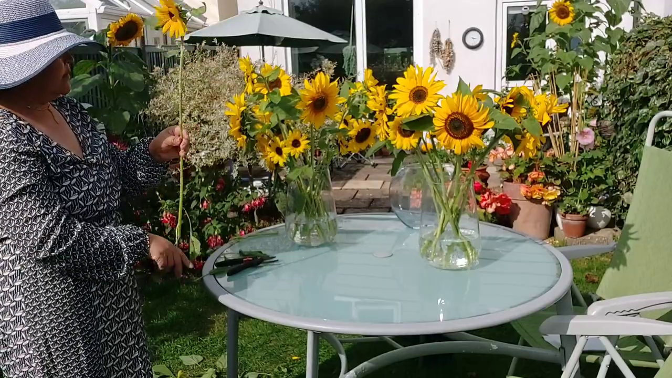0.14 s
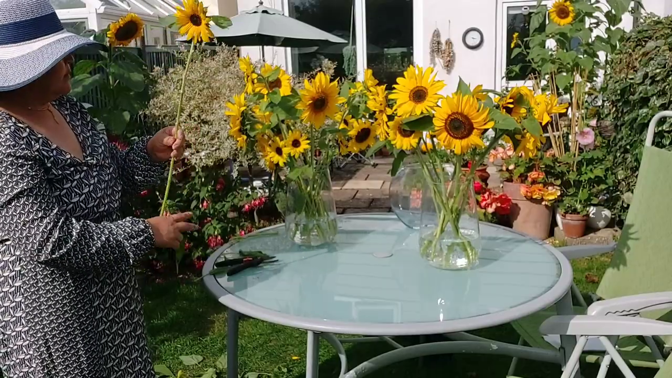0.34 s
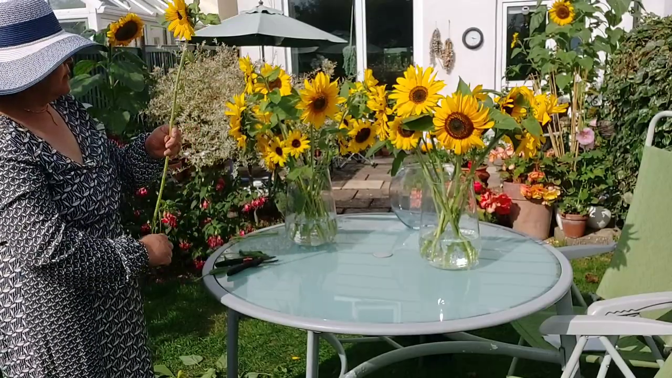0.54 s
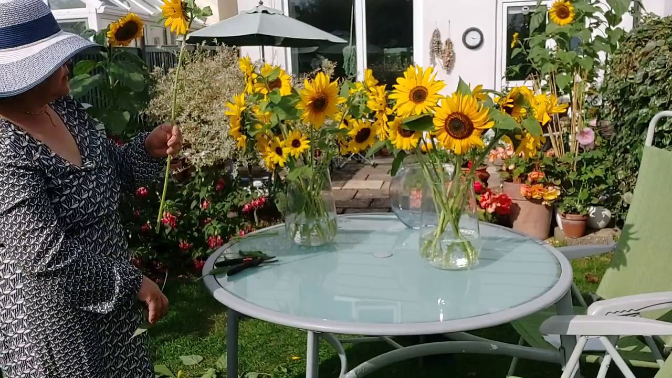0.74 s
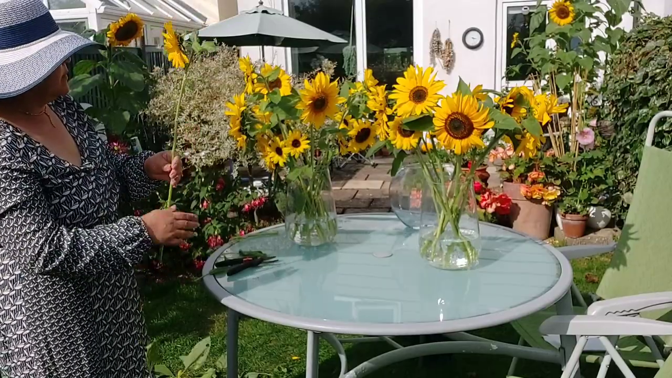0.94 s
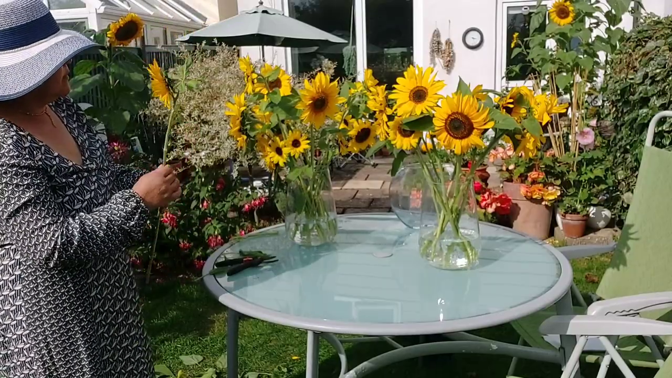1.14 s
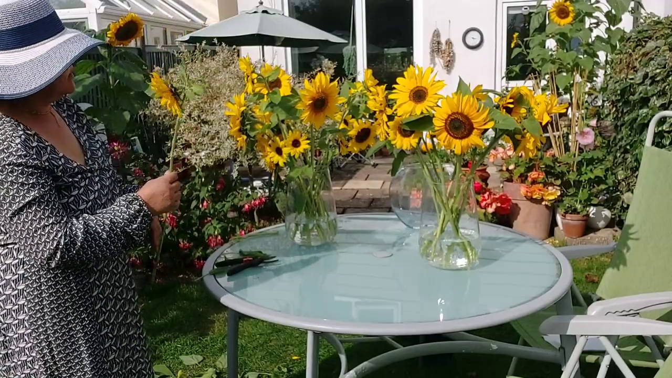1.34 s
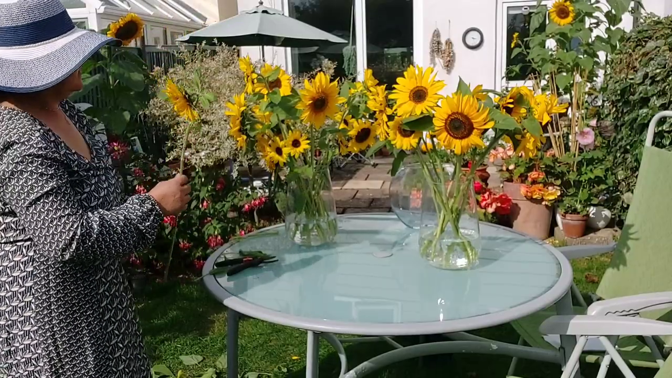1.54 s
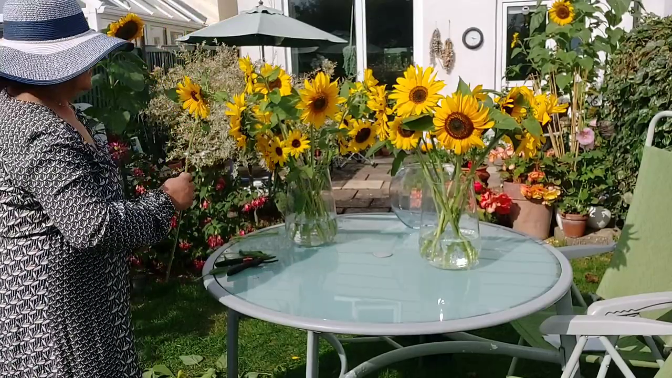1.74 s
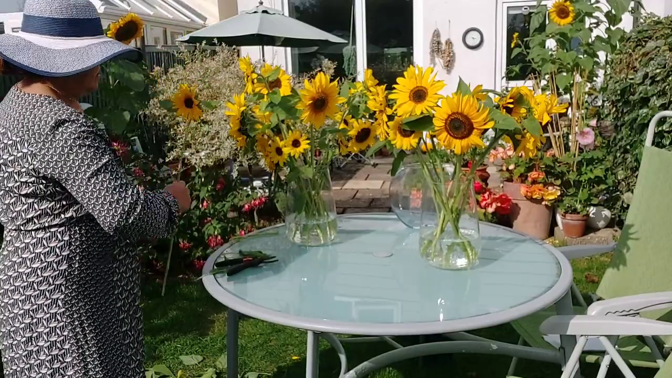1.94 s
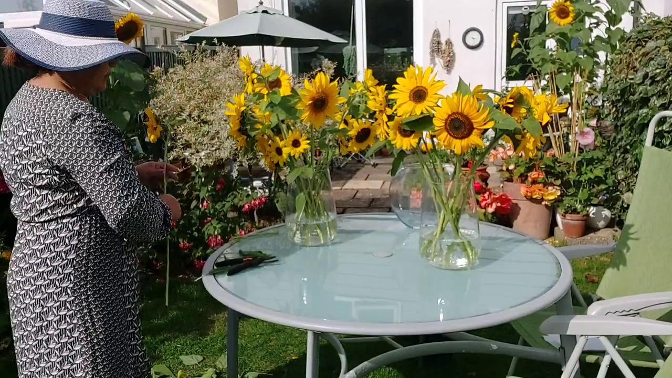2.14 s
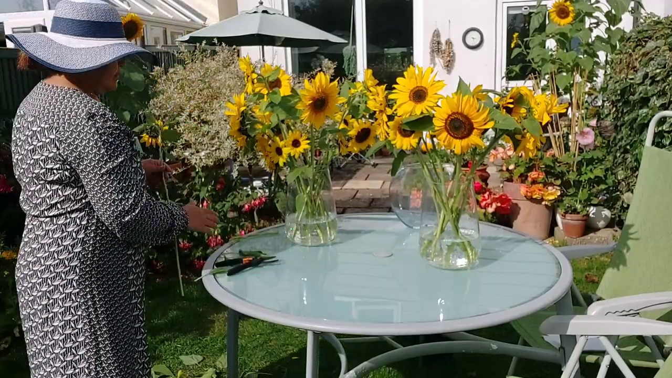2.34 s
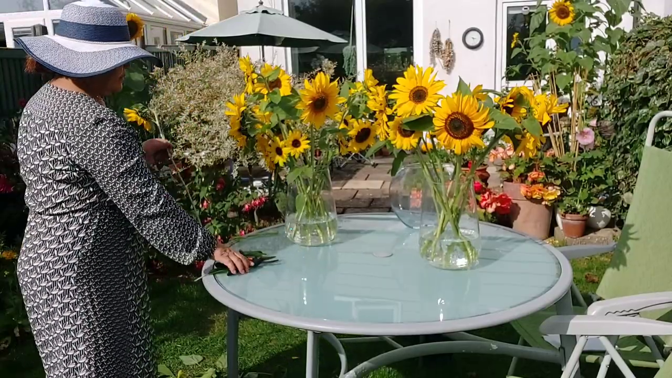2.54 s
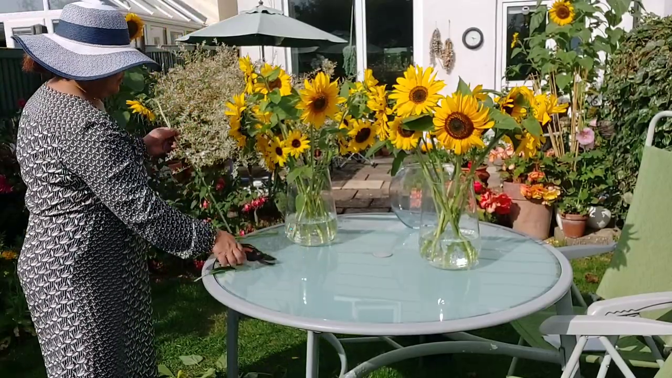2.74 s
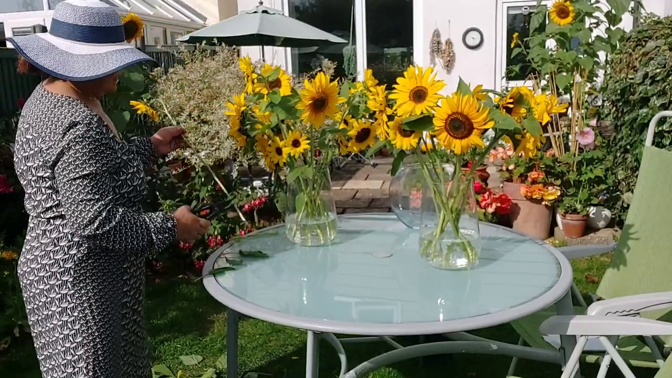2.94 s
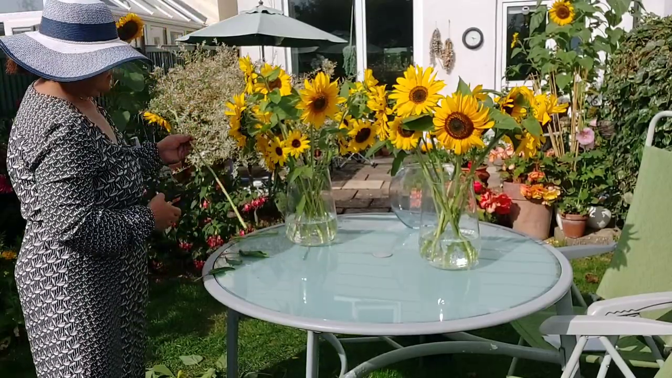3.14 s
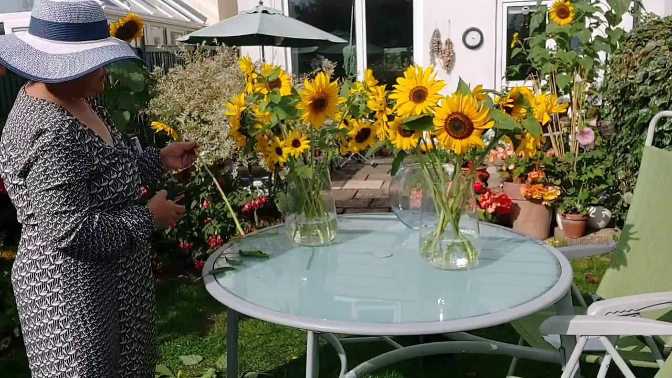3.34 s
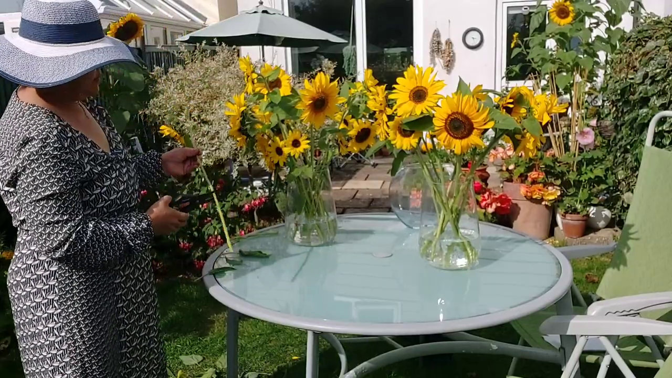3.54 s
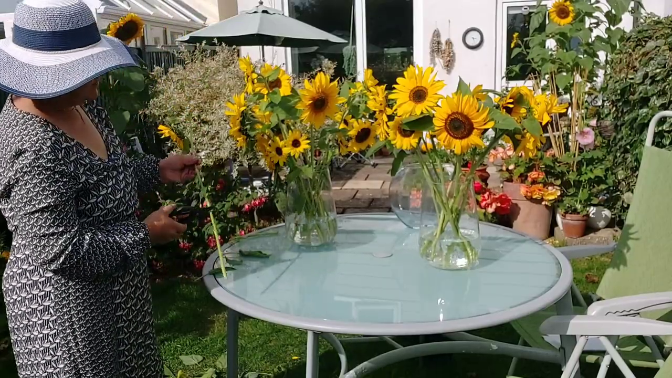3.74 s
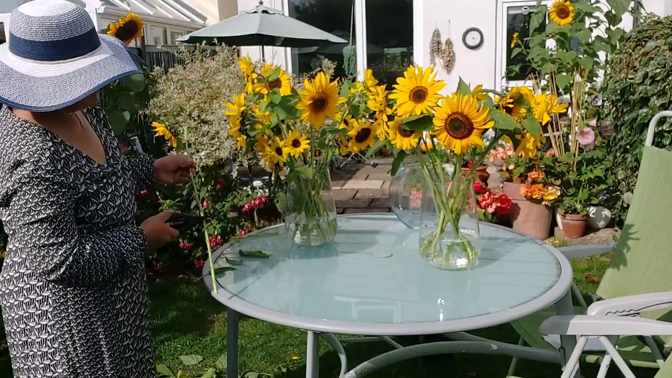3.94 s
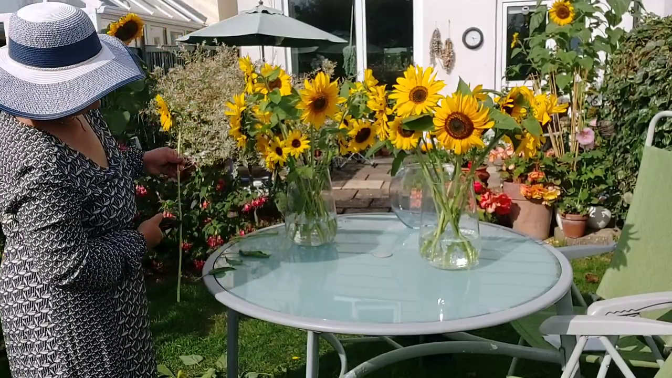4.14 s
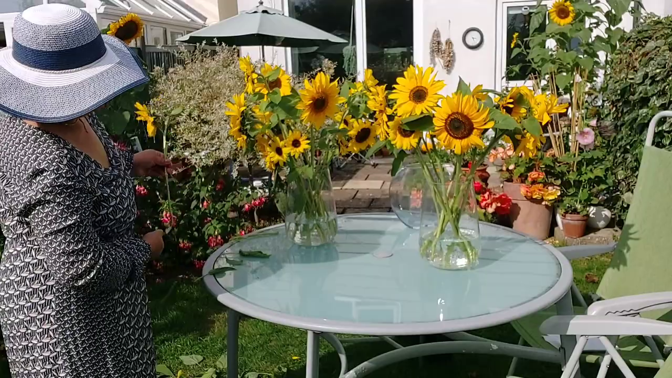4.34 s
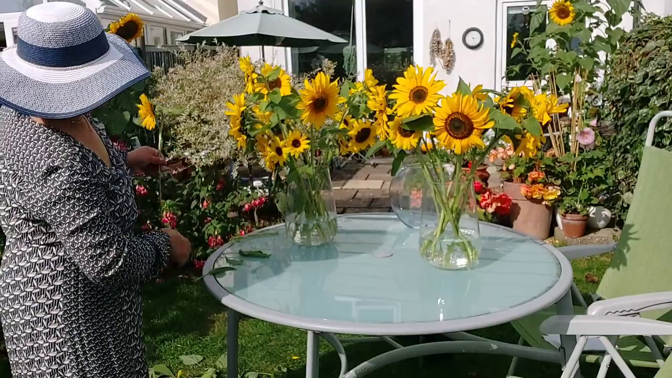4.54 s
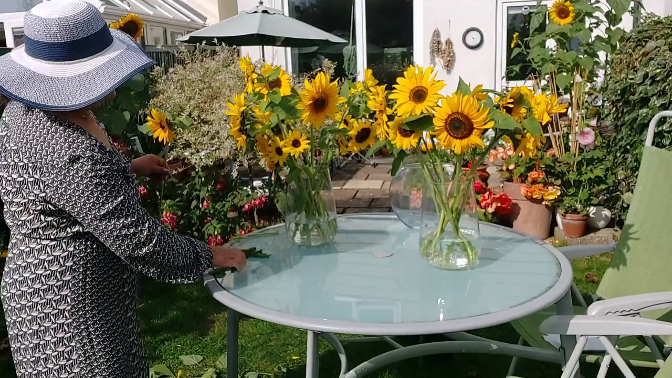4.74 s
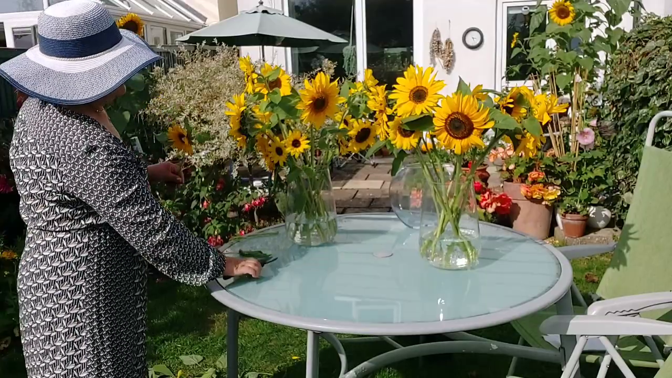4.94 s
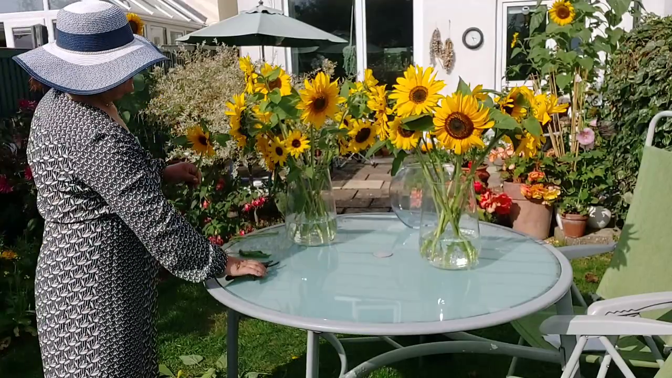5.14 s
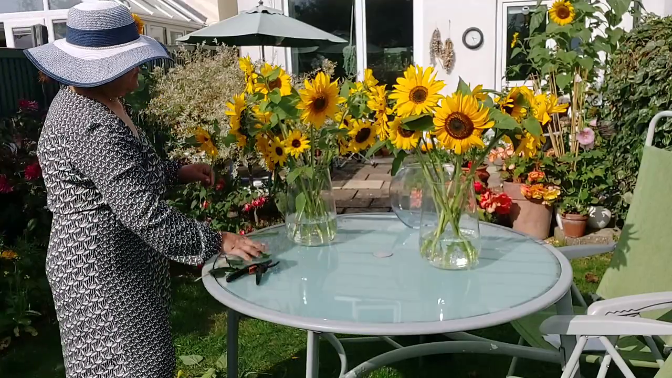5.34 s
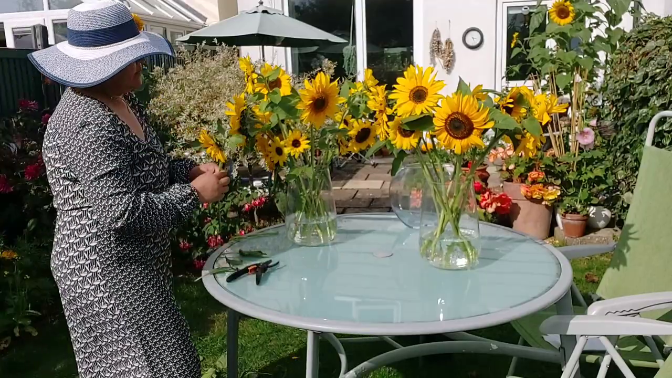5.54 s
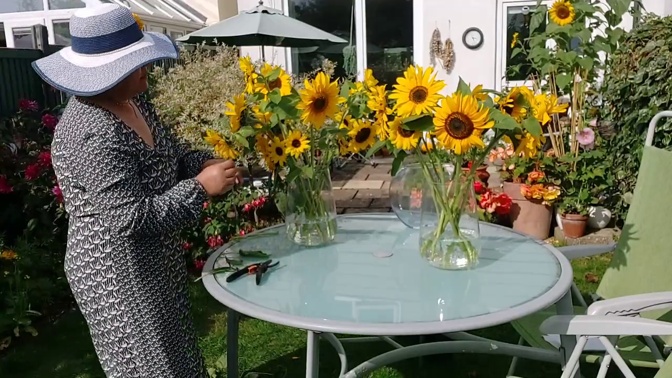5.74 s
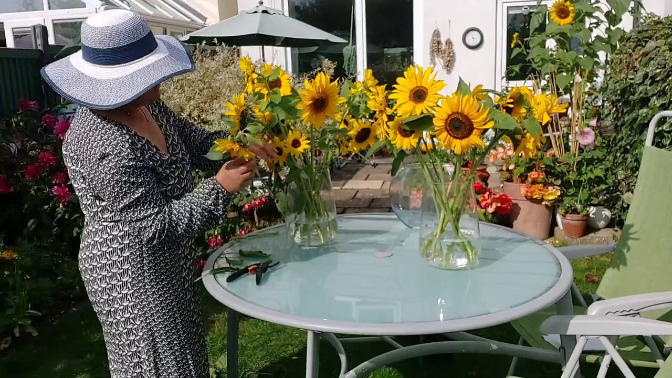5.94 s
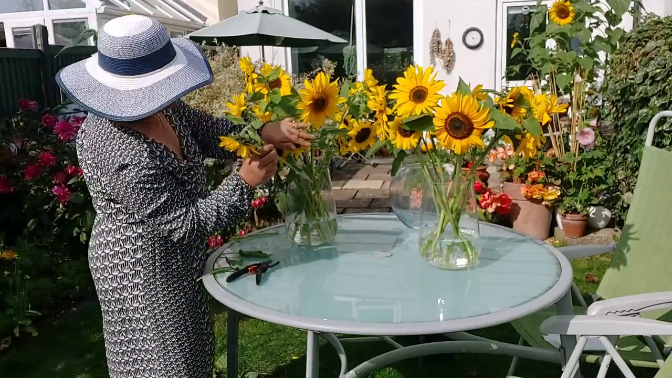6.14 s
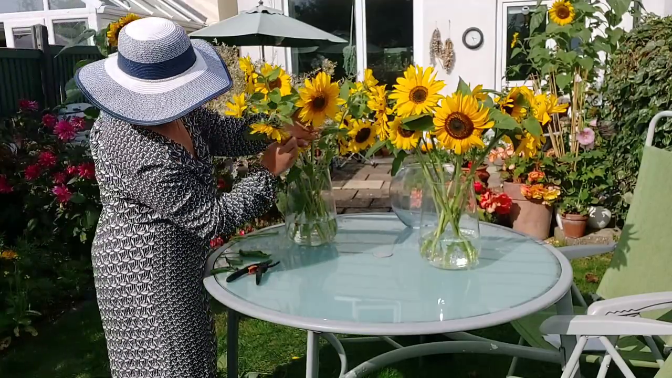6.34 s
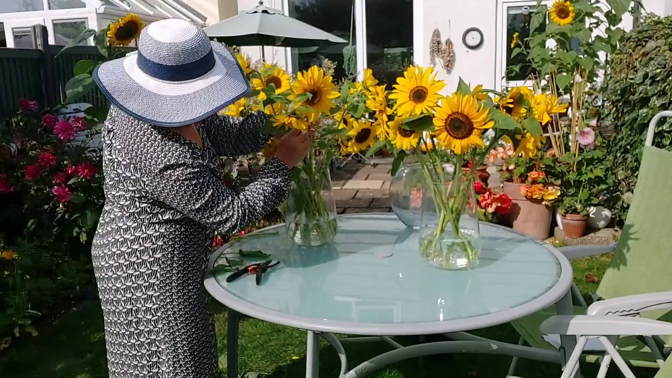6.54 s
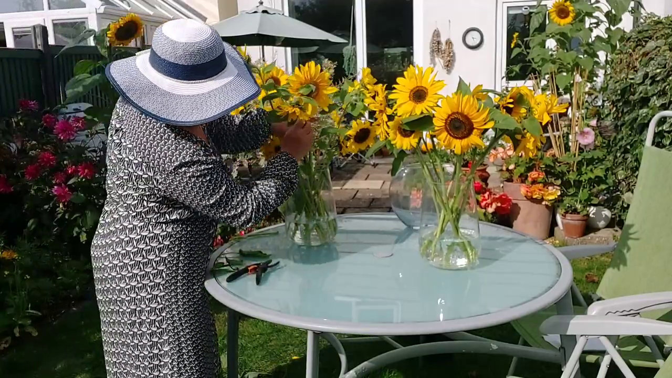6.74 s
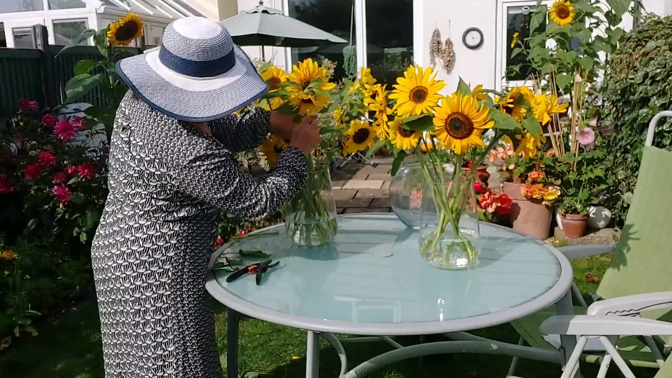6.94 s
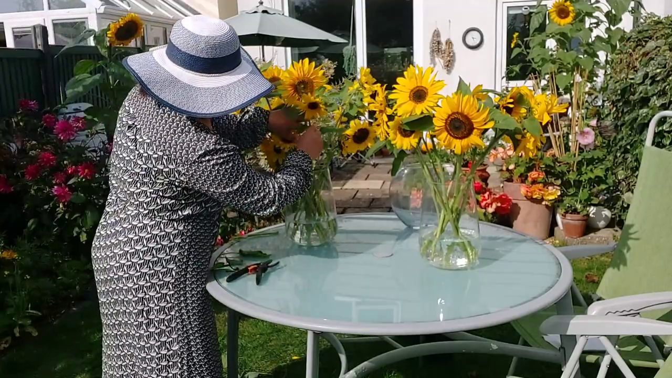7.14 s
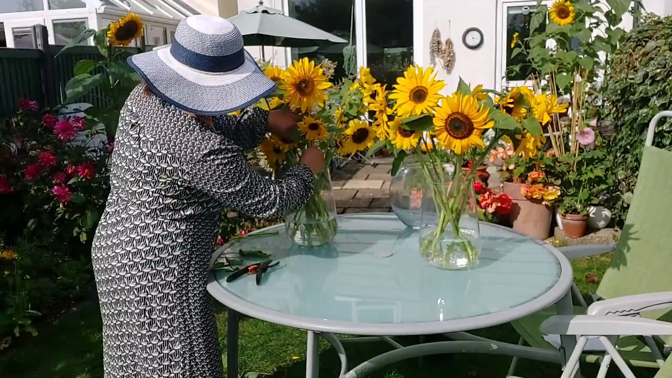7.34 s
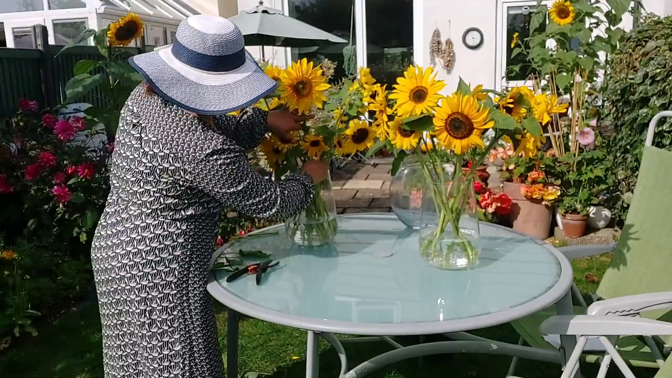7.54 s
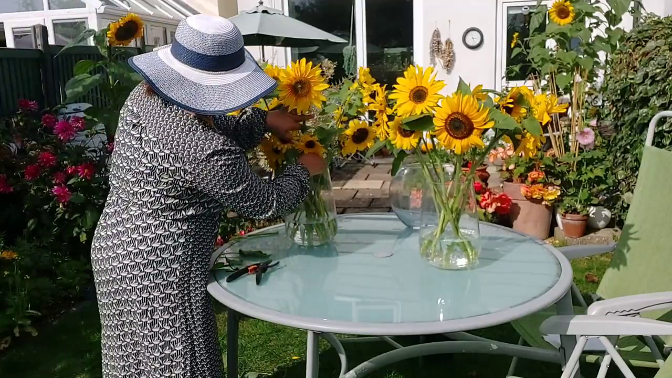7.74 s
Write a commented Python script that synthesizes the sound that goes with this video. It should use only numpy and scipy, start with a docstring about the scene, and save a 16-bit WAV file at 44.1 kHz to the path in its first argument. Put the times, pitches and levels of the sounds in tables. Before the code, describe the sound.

Outdoors, leaves and cloth rustle softly, metal shears are lifted, snip a stem once and knock down on glass over a low town hum.

```python
"""Flowers are trimmed at a glass table in a garden, heard in stereo from a few metres away.
Over the drone of a town, traffic fades and returns and an engine's low hum swells once: noise, slow tones.
Leaves and a dress rustle and tick from the start: crackles of tiny clicks under gain strokes.
Pruning shears clack as they are picked up, crunch through one thick stem and are laid back on the glass:
decaying modes and noise for each blow, coloured crackle for the tearing and the scrape on the glass."""
import sys
import numpy as np
from scipy import signal
from scipy.fft import rfft, irfft, next_fast_len
from scipy.io import wavfile
from scipy.ndimage import uniform_filter1d, map_coordinates

SR = 44100
rng = np.random.default_rng(int(sys.argv[2]) if len(sys.argv) > 2 else 0)


def int16_out(signal):
    """Quantize to a 16-bit WAV file."""
    q = np.round(np.clip(np.atleast_2d(signal).T, -1, 1) * 32767)
    wavfile.write(sys.argv[1], SR, q.astype(np.int16))


N = 342921
T = np.arange(N) / SR
RING = T[:SR // 2]  # time axis of one ringing sound, s


def undb(db):
    """Decibels to gain."""
    return 10 ** (np.asarray(db) / 20)


def unit(x):
    """Scale to rms 1."""
    return x / np.sqrt(np.mean(x ** 2))


def add(out, s, sound):
    """Mix a sound in at time s."""
    i = max(int(s * SR), 0)
    out[:, i:i + sound.shape[1]] += sound[:, :N - i]


def on_log(hz, points):
    """Read (f/Hz, value) points on a log-frequency axis."""
    f, value = np.transpose(points)
    return np.interp(np.log(hz + 1), np.log(f), value)


def bins(x):
    """Frequencies of a signal's spectrum."""
    return np.fft.rfftfreq(x.shape[-1], 1 / SR)


def colour(x, points):
    """Filter a signal through a (f/Hz, level/dB) curve, then set it to rms 1."""
    size = next_fast_len(x.shape[-1])
    gain = undb(on_log(np.fft.rfftfreq(size, 1 / SR), points))
    return unit(irfft(rfft(x, size) * gain, size)[..., :x.shape[-1]])


def spread(pair, reach=1):
    """Two unrelated signals become left and right: alike in the bass; a larger reach keeps them alike higher up."""
    # likeness of two microphones in diffuse sound: f/Hz, correlation
    likeness = [(40, 0.99), (130, 0.94), (300, 0.89), (1000, 0), (2000, 0), (4000, 0.011), (16000, 0)]
    alike = np.clip(on_log(bins(pair) / reach, likeness), -1, 1)
    mid, side = irfft(rfft(pair) * np.sqrt([1 + alike, 1 - alike]), pair.shape[1])
    return np.array([mid + side, mid - side]) / 2


def air(points, size=N, reach=1):
    """Stereo noise of a given colour."""
    noise = rng.standard_normal((2, next_fast_len(size)))
    return colour(spread(noise, reach), points)[:, :size]


def walk(rate):
    """Slow chance with a spread near 1: random values, rate per second, joined smoothly."""
    k = int(SR / rate)
    steps = np.repeat(rng.standard_normal(N // k + 1), k)
    return unit(uniform_filter1d(steps, k)[:N])


def fade(t60):
    """Free decay, 60 dB in t60 seconds."""
    return np.exp(-np.log(1000) * RING / t60)


def gesture(strokes):
    """Gain of strokes that each grow 20 dB over the rise time and sink 20 dB over the fall time; powers add."""
    flank_db = 20
    power = 0
    for s, db, rise, fall in strokes:
        below_peak = np.maximum((s - T) / rise, (T - s) / fall)
        power = power + undb(db - flank_db * np.minimum(below_peak, 10)) ** 2
    return np.sqrt(power)


def flutter(x, depth_db, rate, count=22):
    """Let each of a number of bands waver in level on its own, rate times a second."""
    hz, s, cells = signal.stft(x, SR, nperseg=512)
    band = np.interp(np.log1p(hz), np.log([400, 12000]), [0, count - 1])
    chance = rng.standard_normal((count, int(T[-1] * rate) + 3))
    where = np.meshgrid(band, s * rate, indexing="ij")
    sway = map_coordinates(chance, where, order=1, mode="nearest")
    return unit(signal.istft(cells * undb(depth_db * sway), SR)[1][:, :N])


def crackle(per_s, scatter_db):
    """Tiny fractures: sparse clicks of random sign and uneven size, at rms 1."""
    sizes = undb(scatter_db * np.minimum(rng.exponential(size=(2, N)), 4))
    happens = rng.random((2, N)) < per_s / SR
    return unit(spread(happens * sizes * rng.choice([-1, 1], (2, N))))


def ring(modes, skew):
    """Modes of a struck body, all starting together; high modes differ more in phase between left and right."""
    out = 0
    for k, (hz, db, t60) in enumerate(modes):
        phase_gap = min(skew * (hz / 1000) ** 0.68, np.pi / 2)  # radians
        apart = phase_gap * (-1) ** k * np.array([[1], [-1]]) / 2
        out = out + undb(db) * fade(t60) * np.cos(2 * np.pi * hz * RING + apart)
    # the contact takes a moment to build
    return out * (1 - fade(.005))


def strike(blows, body, crack, crack_db, crack_t60, tail_db, tail_t60):
    """Blows ring clear modes and a crowd of weak ones; a soft contact dulls them, a lasting one damps them."""
    out = np.zeros((2, N))
    decay = undb(crack_db) * fade(crack_t60) + undb(tail_db) * fade(tail_t60)
    crowd = air(crack, size=len(RING), reach=3.44) * decay
    for s, db, hz, damping_t60 in blows:
        contact = signal.butter(4, min(hz, SR / 2 - 1000), fs=SR)
        add(out, s, undb(db) * signal.lfilter(*contact, (body + crowd) * fade(damping_t60)))
    return out


def hiss():
    """Microphone hiss: faint, steady noise, strongest in the top octave."""
    # hiss colour: f/Hz, level/dB per Hz
    hiss_colour = [(3000, -26), (10500, -12), (12500, -2.5), (16000, -3.5)]
    return air(hiss_colour) * undb(-82)


def town():
    """The town's rumble: broad noise, and narrow drones that swell and sink together."""
    # colour of the broad rumble: f/Hz, level/dB per Hz
    town_colour = [(20, -5.5), (40, -4.5), (100, -4.5), (270, -6), (400, -14.5), (620, -21), (1030, -21),
                   (1300, -24.5), (1900, -24), (3000, -39), (5000, -40.5), (9000, -46.5), (16000, -52)]
    # narrow drones in the rumble: f/Hz, width/Hz, level/dB before the swell
    drone_lines = [(98.3, 9, -67.5), (153.2, 14, -68), (217.2, 20, -70), (275.5, 28, -70.5)]
    swell_db, swell_per_s = 0.8, 1.5
    drones = 0
    for hz, width, db in drone_lines:
        # wandering in level and phase widens the line
        wander = walk(width) + 1j * walk(width)
        drones = drones + undb(db) * unit(np.real(wander * np.exp(2j * np.pi * hz * T)))
    return drones * undb(swell_db * walk(swell_per_s)) + air(town_colour) * undb(-61)


def engine():
    """A far engine's low hum swells once and sinks back: a firing tone of unsteady pitch within low noise."""
    # the swell in level: peak t/s, gain/dB, rise/s, fall/s
    swell = [(0.7, -50.5, 2.8, 1.2)]
    # engine noise colour: f/Hz, level/dB per Hz
    engine_colour = [(20, -27), (42, -19.5), (57, -0.5), (72, -11), (110, -17.5), (250, -37),
                     (1000, -100.5)]
    firing_hz, wander_hz, floor_db = 57.1, 2.195, -66
    firing = unit(np.sin(2 * np.pi * np.cumsum(firing_hz + wander_hz * walk(6.7)) / SR))
    hum = undb(-2.5) * air(engine_colour) + undb(-4.5) * firing
    return hum * np.hypot(gesture(swell), undb(floor_db))


def passing(s):
    """Gain of a vehicle nearest at time s: it falls with distance and with what stands in the way."""
    road_m, speed_m_s = 12.94, 14.1
    screen_db_per_m = 0.27  # loss through hedges and houses
    metres = np.hypot(speed_m_s * (T - s), road_m)
    return road_m / metres * undb(-screen_db_per_m * (metres - road_m))


def traffic():
    """Vehicles pass beyond the garden: fluttering tyre noise follows the summed power of the passes."""
    # vehicles: nearest at t/s, tyre roar level/dB
    vehicles = [(0.25, -55), (2.0, -63.5), (6.2, -70.5), (7.6, -61)]
    # tyre roar colour: f/Hz, level/dB per Hz
    tyre_colour = [(70, -4.5), (150, 7.5), (450, 1), (580, -0.5), (780, 0), (880, -1), (1020, 3),
                   (1300, -7), (2100, -9.5), (3200, -19.5), (5000, -30), (9000, -43), (16000, -38.5)]
    roar = np.sqrt(sum((undb(db) * passing(s)) ** 2 for s, db in vehicles))
    return flutter(air(tyre_colour), depth_db=2.5, rate=14) * roar


def foliage():
    """Brushing leaves make a fine grain, broad ones a coarse uneven scuff; now and then a stalk rubs or ticks."""
    # leaves and cloth brush past each other: peak t/s, level/dB, rise/s, fall/s
    rustles = [(0.086, -60, .11, .11), (0.27, -75.5, .1, 0.11), (0.44, -74.5, .05, 0.48),
               (0.748, -70, .06, 0.1), (1.244, -68.5, 0.019, .1), (4.466, -80, .03, 0.048),
               (4.62, -66.5, 0.047, .15), (4.77, -67.5, 0.34, 0.13), (4.88, -76, 0.055, .2),
               (5.635, -65.5, 0.08, 0.39), (5.85, -73, 0.12, 0.055), (7.235, -71.5, 0.22, 0.56),
               (7.56, -85, 0.33, 0.33)]
    # colour of the fine brushing: f/Hz, level/dB per Hz
    leaf_colour = [(900, -10), (2100, 3.5), (3200, 0.5), (5500, 1), (9000, -1.5), (13000, -1.5),
                   (16000, -11.5)]
    # broad leaves drag over each other: peak t/s, level/dB, rise/s, fall/s
    drags = [(0.04, -67, 0.21, 1.3), (0.42, -71, .04, .1), (3.29, -73, .07, .08), (4.62, -60, 0.038, 0.053),
             (4.76, -73, 0.28, 0.34), (5.66, -68, 0.15, .33), (5.96, -64.5, .02, 0.04),
             (7.1, -70.5, 1.7, 0.65), (7.5, -66, 0.8, 3.5)]
    # colour of the coarse dragging: f/Hz, level/dB per Hz
    broad_colour = [(500, -15.5), (1300, 4.5), (2050, 10.5), (2500, -4.5), (3000, 1), (3600, -19),
                    (4700, -8.5), (5100, -26), (5550, -11.5), (6200, -20.5), (8000, -27), (16000, -20)]
    # a stalk rubs along the hand or its neighbours: peak t/s, level/dB, rise/s, fall/s
    rubs = [(0.08, -63.5, .1, .08), (3.29, -77, .06, .07), (7.09, -81, .08, .15), (7.24, -77, .06, .1)]
    # colour of the rubbing: f/Hz, level/dB per Hz
    rub_colour = [(2500, -26), (4200, -7), (5000, -4), (6000, -8), (9000, -28)]
    # stalks and leaves tick: t/s, relative level/dB, centre f/Hz
    ticks = [(0.621, -53.5, 10000), (1.963, -67.5, 6500), (3.817, -64.5, 9900), (3.930, -58.5, 7500),
             (4.152, -67, 9000), (5.154, -59.5, 4790), (5.846, -57, 10000), (5.957, -67, 4460),
             (6.112, -66, 12000), (6.224, -69, 11100), (6.774, -64, 4200), (7.235, -65, 5500)]
    fine = crackle(per_s=3000, scatter_db=2.5)
    coarse = crackle(per_s=900, scatter_db=3)
    brushing = flutter(colour(fine, leaf_colour), depth_db=2.0, rate=25, count=14)
    dragging = flutter(colour(coarse, broad_colour), depth_db=2.5, rate=16, count=14)
    rubbing = colour(crackle(per_s=1600, scatter_db=1), rub_colour)
    out = brushing * gesture(rustles) + dragging * gesture(drags) + rubbing * gesture(rubs)
    for s, db, hz in ticks:
        tick = air([(hz / 4, -18), (hz, 0), (hz * 2, -8)], size=len(RING))
        add(out, s, undb(db - 2.5) * tick * fade(0.03))
    return out


def shears():
    """Steel blades and handles knock together as the shears are lifted; the grip damps their ringing modes."""
    # clacks: t/s, relative level/dB, contact brightness f/Hz, t60 of the damping by the grip/s
    clacks = [(2.7212, -18, 3520, 0.15), (2.7253, -1, 15900, 0.68), (2.7343, -8.5, 9000, 0.43)]
    # modes of the shears: f/Hz, relative level/dB, undamped t60/s
    steel_modes = [(1370, -9, .07), (1436, -11, .07), (1540, -9, .11), (1640, -5, .055), (1698, -7, .09),
                   (1790, 3, .06), (1860, -3, .055), (1955, -2, .06), (2013, 0, .1), (3200, -12, .1),
                   (4565, -13, .07), (4750, -17, .1), (4970, -16, .06), (6700, -16, .11), (7090, -20, .08),
                   (7650, -20, .09)]
    # colour of the crowded weak modes between them: f/Hz, level/dB per Hz
    steel_crack = [(300, -40), (900, -14), (1700, -34), (2600, -9.5), (3100, 4), (3400, -6), (4500, -3.5),
                   (7000, -1.5), (9500, -9.5), (13000, -7), (16000, -7)]
    return undb(-26) * strike(clacks, ring(steel_modes, skew=0.75), steel_crack,
                              crack_db=-12, crack_t60=0.043, tail_db=-9.5, tail_t60=0.14)


def table():
    """The glass rings under a knock at the lift; later the shears touch it with a short scrape, tip over and land."""
    # blows, the resting shears damp the glass: t/s, relative level/dB, contact brightness f/Hz, damping t60/s
    blows = [(2.729, -5.5, 617, 5.3), (5.1425, -25, 1710, 0.28), (5.147, -7, 620, 2.8),
             (5.209, -14, 1450, .2), (5.2145, 2, 630, 0.047), (5.2262, -12, 3530, 0.067),
             (5.2295, 1, 7470, 0.36)]
    # modes of the glass table: f/Hz, relative level/dB, undamped t60/s
    glass_modes = [(285, -19, .22), (634, -6.5, .22), (778, -15, .15), (842, -9, .13), (984, -12, .15),
                   (1150, -9, .08), (1293, -14, .05), (1435, -10, .13), (1490, 3, .1), (1539, 2, .09),
                   (1660, -1, .035), (1738, 6, .105), (1892, -4, .07), (1975, 2, .07), (2276, -7, .14),
                   (2815, -8, .11), (3062, -12, .08), (3183, -10, .13), (3372, -13, .13), (3676, -6, .11),
                   (4350, -15, .11), (4685, -15, .1), (4957, -20, .12), (5435, -17, .11)]
    # colour of the crowded weak modes between them: f/Hz, level/dB per Hz
    glass_crack = [(250, -18.5), (450, -12.5), (650, -3), (1100, -1.5), (1650, 7.5), (2600, -11),
                   (3600, -15), (5500, -17), (7500, -28.5), (10000, -36), (16000, -18)]
    # a short scrape at the first touch, a brief grainy swell into the landing: peak t/s, level/dB, rise/s, fall/s
    grain_strokes = [(5.155, -61, 0.037, 0.034), (5.224, -43.5, 0.023, 0.037)]
    # colour of both: f/Hz, level/dB per Hz
    grain_colour = [(1000, -2), (2500, -3), (4200, 2.5), (5600, -5), (7500, -23.5), (10000, -21),
                    (16000, -22)]
    knocks = strike(blows, ring(glass_modes, skew=0.57), glass_crack,
                    crack_db=-5, crack_t60=0.085, tail_db=-6, tail_t60=0.19)
    grain = colour(crackle(per_s=9600, scatter_db=5.5), grain_colour)
    return undb(-26) * knocks + grain * gesture(grain_strokes)


def cut():
    """Fibres tear one after another under the blade; the rind snaps and rings the hollow stem."""
    # the blade enters the stem, then drives through it: peak t/s, relative level/dB, rise/s, fall/s
    bites = [(4.236, -50, 0.014, 0.055), (4.27, -43, 0.035, 0.031)]
    # the rind gives way: t/s, relative level/dB, brightness f/Hz, t60 of the damping by the blade/s
    rind_snaps = [(4.2329, -9, 9000, .5), (4.2628, 0.5, 6000, 0.044), (4.2683, 1, 15000, 0.093)]
    # modes of the hollow stem: f/Hz, relative level/dB, undamped t60/s
    stem_modes = [(480, -4, 0.027), (1223, 6, 0.065), (1730, -10, 0.024), (2164, -20, 0.087),
                  (5020, -0.5, .04), (5840, 0, 0.055)]
    # colour of tearing fibres and of the snap's noise: f/Hz, level/dB per Hz
    fibre_colour = [(200, -27), (500, -6.5), (800, -16), (1230, -7.5), (1420, -11), (2000, -3),
                    (2700, -10.5), (5200, -11), (9000, -12.5), (16000, -19.5)]
    fractures = crackle(per_s=4500, scatter_db=2.5)
    tearing = undb(-1.5) * colour(fractures, fibre_colour) * gesture(bites)
    snaps = strike(rind_snaps, ring(stem_modes, skew=0.44), fibre_colour,
                   crack_db=-0.5, crack_t60=0.013, tail_db=-4.5, tail_t60=0.14)
    return tearing + undb(-45.5) * snaps


def garden(x, wet_db, t60):
    """House walls and fences throw back a short, dull scatter: convolution with decaying noise."""
    scatter = air([(100, -2), (2000, 6), (6000, 1), (16000, -10)], size=len(RING))
    echo = scatter * fade(t60) * (1 - np.exp(-RING / .015))  # soft onset
    echo = echo / np.sqrt(np.sum(echo ** 2) / 2)
    return x + undb(wet_db) * signal.fftconvolve(x, echo, axes=1)[:, :N]


def scene():
    """The work at the table in the open air; its middle range is a shade louder on the right."""
    # stereo balance of the work: f/Hz, left minus right/dB
    lean = [(400, 1), (700, 0.5), (1400, -3), (2400, 1), (4500, -1.5), (13000, 1)]
    outdoors = hiss() + town() + engine() + traffic()
    work = foliage() + shears() + table() + cut()
    lean_db = on_log(bins(work), lean)
    work = irfft(rfft(work) * undb(np.array([lean_db, -lean_db]) / 2), N)
    return garden(work, wet_db=-18.5, t60=0.14) + outdoors


def record(dry):
    """A steep low-pass cuts the top."""
    top_hz = 15850
    return signal.sosfilt(signal.ellip(10, .2, 70, top_hz, fs=SR, output="sos"), dry)


dry = scene()
out = record(dry)
int16_out(out)
```